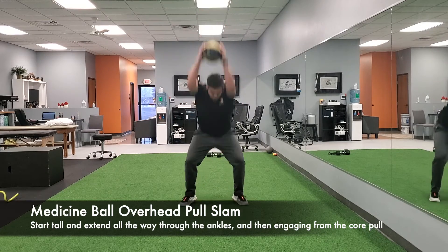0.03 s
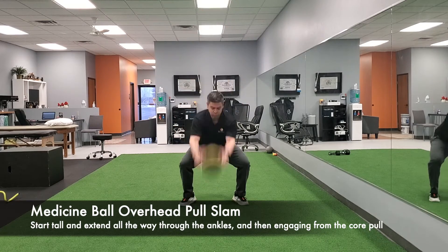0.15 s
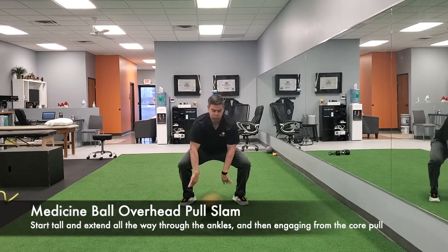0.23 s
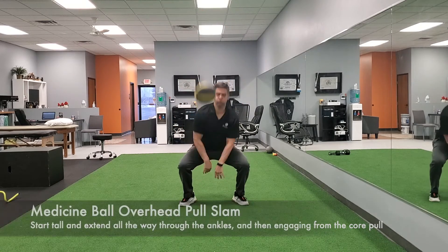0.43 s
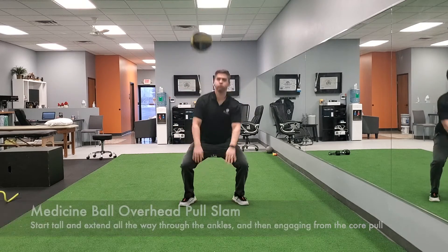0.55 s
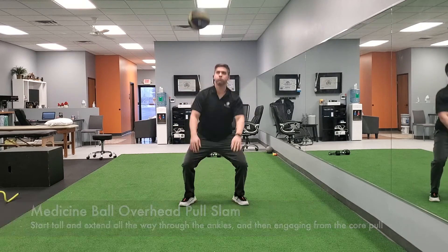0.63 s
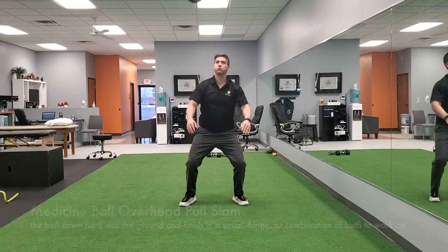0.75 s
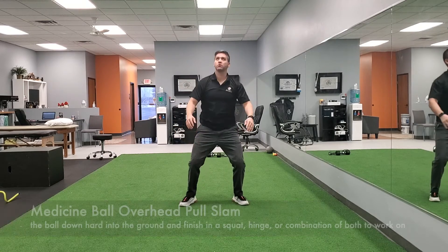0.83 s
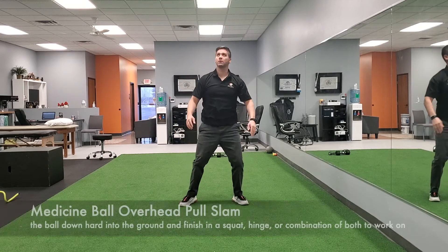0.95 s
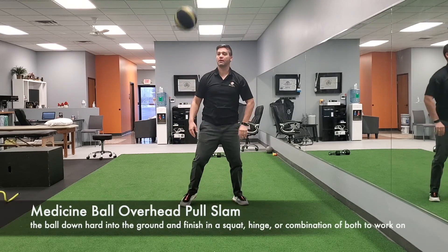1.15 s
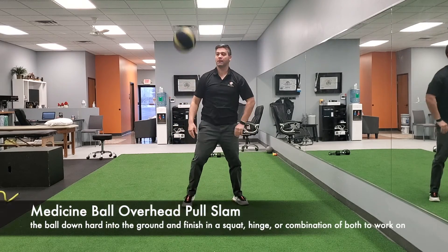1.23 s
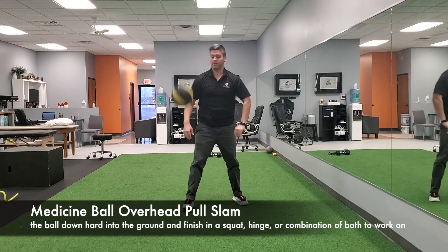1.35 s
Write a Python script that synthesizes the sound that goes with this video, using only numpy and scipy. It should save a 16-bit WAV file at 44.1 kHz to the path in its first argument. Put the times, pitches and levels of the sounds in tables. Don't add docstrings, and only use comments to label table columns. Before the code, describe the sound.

Faint cloth rustle, then a single powerful thud of a heavy ball on turf over a hard slab, with a short room tail, a fine gritty patter and quiet ventilation rumble, heard in stereo from a few metres.

```python
import sys
import numpy as np
from scipy import signal
from scipy.fft import rfft, irfft
from scipy.io import wavfile
from scipy.ndimage import uniform_filter1d

SR = 44100
rng = np.random.default_rng(int(sys.argv[2]) if len(sys.argv) > 2 else 0)


def wav_record(signal):
    frames = np.transpose(np.atleast_2d(signal))
    bounded = np.clip(frames, -1, 1)
    quanta = np.round(bounded * 32767).astype(np.int16)
    wavfile.write(sys.argv[1], SR, quanta)


def gain_from_db(level_db):
    decades = np.asarray(level_db, float) / 20
    return 10 ** decades


N = 61739
TIME_S = np.arange(N) / SR
BIN_HZ = np.fft.rfftfreq(N, 1 / SR)
HIT_S = 0.2299


def since(s):
    return np.maximum(TIME_S - s, 0)


def evened(x):
    return x / np.sqrt(np.mean(x ** 2) + 1e-20)


def read(points, hz):
    f, value = np.transpose(points)
    return np.interp(np.log(hz + 1), np.log(f + 1), value)


def colour(x, points):
    return irfft(rfft(x) * gain_from_db(read(points, BIN_HZ)), N)


def narrow(x, f_hz, width_hz):
    detuning = 2 * (BIN_HZ - f_hz) / width_hz
    return evened(irfft(rfft(x) / (1 + detuning ** 2), N))


def diffuse(a, b):
    # (frequency [Hz], likeness [0-1])
    likeness = [(60, 1), (130, 1), (290, 0.81), (640, 0.5), (1410, 0.2), (3100, 0.09), (6820, 0.21),
                (15000, 0.3)]
    same = np.clip(read(likeness, BIN_HZ), 0, 1)
    shared = np.sqrt((1 + same) / 2) * rfft(a)
    opposed = np.sqrt((1 - same) / 2) * rfft(b)
    return irfft(np.array([shared + opposed, shared - opposed]), N)


def hiss(grain_db):
    size = gain_from_db(grain_db * uniform_filter1d(rng.standard_normal(N), size=40) * 3.8)
    return evened(diffuse(*(rng.standard_normal((2, N)) * size)))


def wobble(size):
    return evened(uniform_filter1d(uniform_filter1d(rng.standard_normal(N), size), size))


def ball():
    # (frequency [Hz], level [dB], t60 [s])
    shell = [(312, 1, .014), (385, -17, .07), (475, -19, .05), (545, -16, .08), (605, -23, .06),
             (690, -25, .05), (785, -19, .08)]
    # (frequency [Hz], level [dB per Hz])
    fibres = [(1000, 3), (2500, -4.5), (3400, -6.5), (6000, -4), (8000, -9), (15500, -18)]
    level_db, swell_s = -4, 0.0012
    contact_s = 0.0058
    slap_hz, slap_db, slap_lag_s = 2100, -5, 0.0008
    scuff_db, scuff_t60_s = -20.5, 0.027

    t, released = since(HIT_S), since(HIT_S + contact_s)
    ring = 0
    for hz, db, t60_s in shell:
        ring = ring + gain_from_db(db - 60 * released / t60_s) * np.sin(2 * np.pi * hz * t)
    ring = ring * (1 - np.exp(-t / swell_s))

    u = np.pi * slap_hz * (TIME_S - HIT_S - slap_lag_s)
    slap = gain_from_db(slap_db) * (1 - 2 * u ** 2) * np.exp(-u ** 2)

    late = since(HIT_S + slap_lag_s)
    crush = gain_from_db(scuff_db - 60 * late / scuff_t60_s) * (1 - np.exp(-late / swell_s))
    scuff = crush * evened(colour(rng.standard_normal(N), fibres))
    return -gain_from_db(level_db) * (ring + slap + scuff)


def slab():
    mode_hz = [56, 83, 101.5, 124, 218, 246, 298, 323, 355, 383]
    # (level [dB], t60 [s], rise [s])
    mode_decay = [(-15, 0.41, 0.0061), (-6.5, 0.28, 0.012), (-11.5, 0.75, 0.0013), (-21, 1, 0.023),
                  (-19, 0.69, 0.024), (-16.5, 0.74, 0.061), (-22.5, 0.52, .02), (-27.5, 0.76, 0.027),
                  (-20.5, 0.58, 0.0077), (-21, 0.697, 0.011)]
    lag_s = 0.0083
    lead_s, lead_hz, lead_db, lead_t60_s = 0.00518, 675, -21.5, 0.12
    push_hz, push_db, push_t60_s = 67.3, -18, 0.16

    t = since(HIT_S + lag_s)
    modes = 0
    for hz, (db, t60_s, rise_s) in zip(mode_hz, mode_decay):
        swell = 1 - np.exp(-t / abs(rise_s))
        modes = modes + gain_from_db(db - 60 * t / t60_s) * swell * np.sin(2 * np.pi * hz * t)

    pressed = since(HIT_S)
    push = gain_from_db(push_db - 60 * pressed / push_t60_s) * np.sin(2 * np.pi * push_hz * pressed)

    early = since(HIT_S - lead_s)
    knock = gain_from_db(lead_db - 60 * early / lead_t60_s) * np.sin(2 * np.pi * lead_hz * early)
    knock = knock * np.minimum(early / 0.0005, 1)
    return knock + push - modes


def room(x):
    # (frequency [Hz], level [dB])
    returned = [(60, 18.5), (150, 1.5), (300, -7), (480, 7), (800, 0), (2000, 3.5), (4000, -7),
                (12000, -2.5)]
    # (frequency [Hz], t60 [s])
    decay = [(60, .55), (120, 1), (250, 0.96), (500, 0.5), (1000, 0.31), (3000, 0.15), (8000, 0.71)]
    echo_s = [.0055, .0112, .0207, .0228, .0308, .049]
    # (level [dB], left over right [dB])
    echoes = [(-17, 1), (-17, 1), (-13, 2), (-14, 1), (-11, 2), (-18, 0)]
    tail_db, rise_s = -9.5, 0.005

    hz, t, z = signal.stft(diffuse(*rng.standard_normal((2, N))), SR, nperseg=512)
    fade_db = read(returned, hz)[:, None] - 60 * t / read(decay, hz)[:, None]
    tail = signal.istft(z * gain_from_db(fade_db), SR, nperseg=512)[1][:, :N]
    tail = tail * (1 - np.exp(-TIME_S / rise_s))
    response = gain_from_db(tail_db) * tail / np.linalg.norm(tail[0]) * 3
    for s, (db, pan_db) in zip(echo_s, echoes):
        response[:, round(s * SR)] += gain_from_db(db + np.array([0.5, -0.5]) * pan_db)
    return signal.fftconvolve(x[None], response, axes=1)[:, :N]


def shower():
    # (time [s], level [dB])
    strength = [
        (.235, -71),
        (0.266, -31),
        (0.299, -32),
        (.45, -39.5),
        (.6, -43.5),
        (.72, -50.5),
        (.8, -59),
        (.9, -68),
        (1.0, -84),
    ]
    # (frequency [Hz], level [dB per Hz])
    crumb_colour = [(500, 8.5), (1000, 2), (2200, -1), (5000, -8.5), (6800, -13.5), (9000, -13.5),
                    (15500, -13)]
    # (frequency [Hz], width [Hz], level [dB], fade against the shower [dB per s])
    loose_metal = [(2200, 200, -19, 0), (3290, 70, -12, 12), (5650, 160, -15, 15), (5950, 200, -17, 40),
                   (15500, 200, -17, 90)]
    fine_hz, fine_s, fine_rise_s = 6000, 0.265, 0.02
    buzz_s, buzz_rise_s = 0.281, 0.021
    patter_db = 0.6

    crumbs = evened(colour(hiss(1.9), crumb_colour))
    coarse = colour(crumbs, [(fine_hz, 0), (fine_hz * 1.5, -30)])
    fine = crumbs - coarse
    out = coarse + fine * (1 - np.exp(-since(fine_s) / fine_rise_s))

    shaken = since(buzz_s)
    for hz, width_hz, db, fade_db in loose_metal:
        strength_of_buzz = gain_from_db(db - fade_db * shaken + 0.67 * wobble(size=900))
        onset = 1 - np.exp(-shaken / buzz_rise_s)
        out = out + strength_of_buzz * onset * narrow(hiss(0.62), hz, width_hz)

    s, db = np.transpose(strength)
    return out * gain_from_db(np.interp(TIME_S, s, db, left=-120) + patter_db * wobble(size=500))


def sleeves():
    # (middle [s], half length [s], level [dB], brightness in the treble [dB])
    swings = [
        (.085, 0.074, -49, -8.5),
        (0.2, 0.055, -51, 7),
        (1.197, 0.048, -65.5, -3),
        (1.4, 0.026, -86, -2),
    ]
    # (frequency [Hz], level [dB per Hz])
    cloth = [(600, 1), (1500, -1), (3500, -4), (6500, -9), (9000, -11.5), (15500, -6.5)]
    # (frequency [Hz], width [Hz])
    squeaks = [(3450, 400), (4600, 250)]
    squeak_s, squeak_half_s, squeak_db = 1.2, 0.04, -74

    out = 0
    for mid_s, half_s, db, bright_db in swings:
        rustle = evened(colour(hiss(0.89), cloth))
        rustle = colour(rustle, [(6000, 0), (13000, bright_db)])
        out = out + rustle * gain_from_db(db) * np.exp(-((TIME_S - mid_s) / half_s) ** 2)
    squeak = sum(narrow(hiss(0.89), hz, width_hz) for hz, width_hz in squeaks)
    return out + squeak * gain_from_db(squeak_db) * np.exp(-((TIME_S - squeak_s) / squeak_half_s) ** 2)


def air():
    # (frequency [Hz], level [dB per Hz])
    rumble = [(25, -11.5), (64, -1), (190, -15.5), (260, -20), (775, -18.5), (1200, -27), (5000, -48.5),
              (15000, -70)]
    sway_db = 1.0
    level_db = -48.5 + np.interp(TIME_S, [0.2, 0.7, 0.9], [4, 3, 0])
    return evened(colour(hiss(0.3), rumble)) * gain_from_db(level_db + sway_db * wobble(size=1500))


def scene():
    blow = ball()
    return blow + slab() + room(blow) + shower() + sleeves() + air()


def top_cut(x):
    return signal.sosfilt(signal.butter(12, 16610, fs=SR, output="sos"), x)


def record(dry):
    # (frequency [Hz], level [dB])
    mic = [(22, -18), (45, 2), (6800, -0.5), (7600, -10.5), (8600, -4), (9500, -3)]
    # (frequency [Hz], level [dB])
    passband = [(15750, 0), (15850, -16), (16500, -20), (16700, -70)]
    self_noise_db, lean_db = -83.5, 1.77
    x = dry + gain_from_db(self_noise_db) * rng.standard_normal(dry.shape)
    x = colour(x, mic) * gain_from_db(np.array([[0.5], [-0.5]]) * lean_db)
    limited = np.tanh(x / 1.606) * 1.545
    return top_cut(colour(limited, passband))


dry = scene()
out = record(dry)
wav_record(out)
```